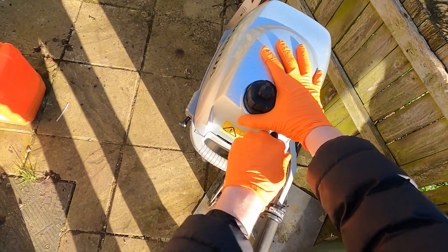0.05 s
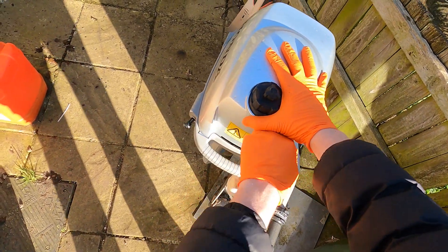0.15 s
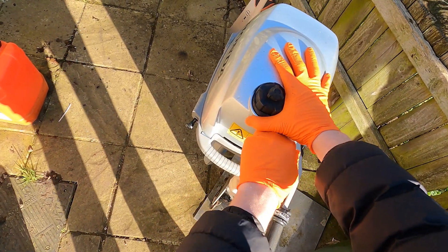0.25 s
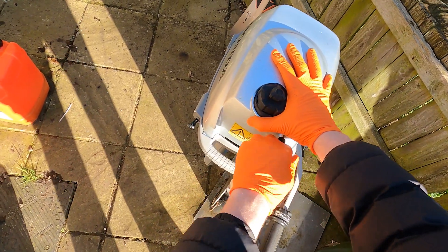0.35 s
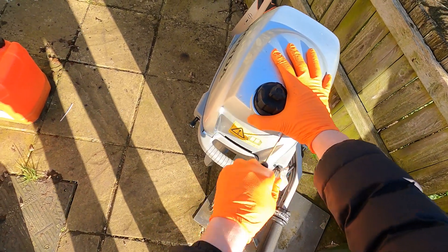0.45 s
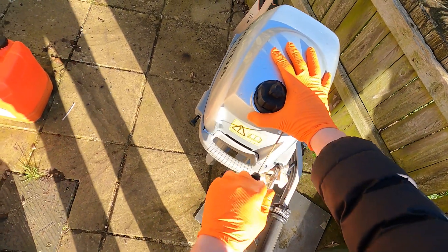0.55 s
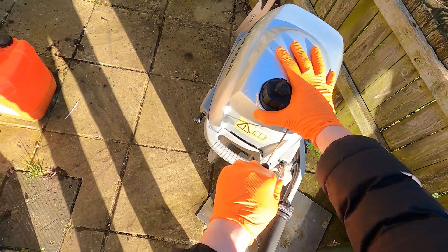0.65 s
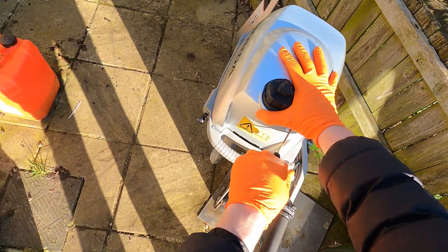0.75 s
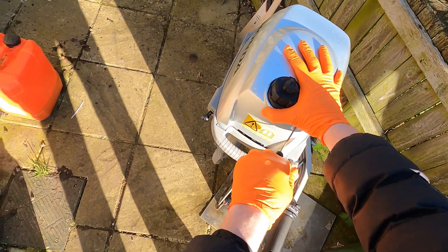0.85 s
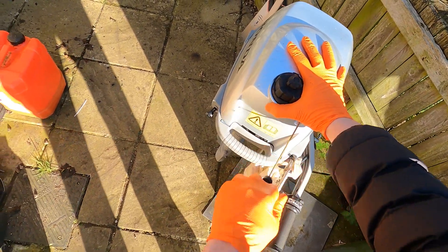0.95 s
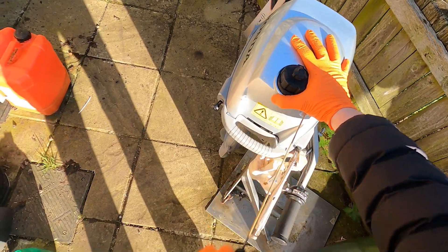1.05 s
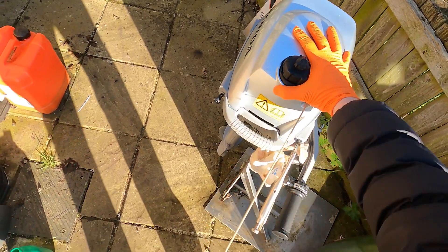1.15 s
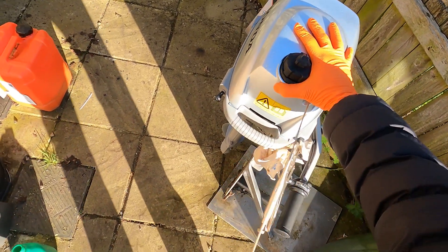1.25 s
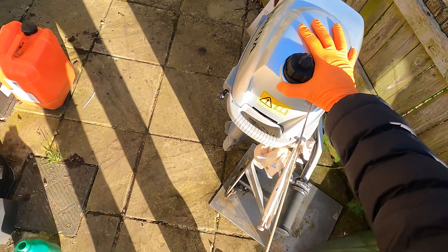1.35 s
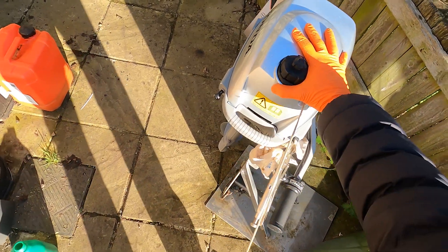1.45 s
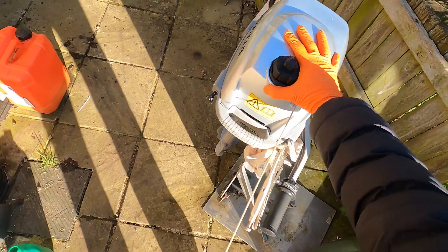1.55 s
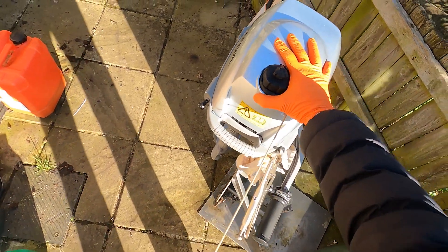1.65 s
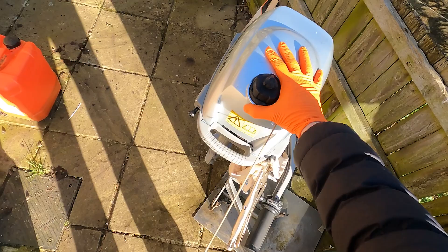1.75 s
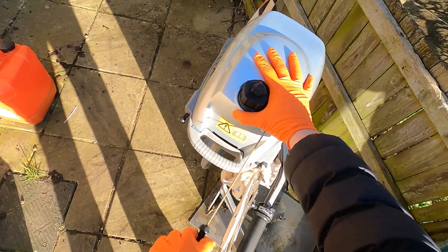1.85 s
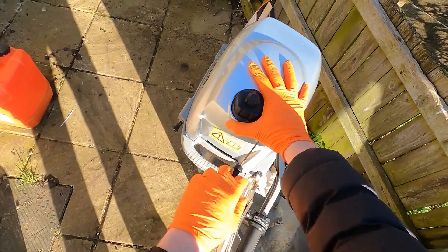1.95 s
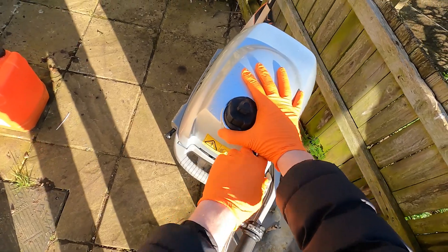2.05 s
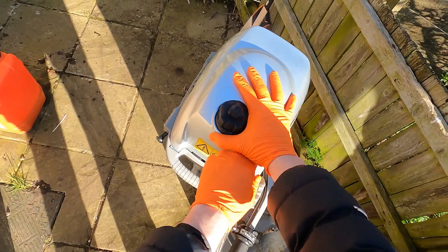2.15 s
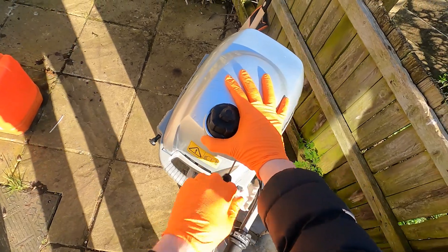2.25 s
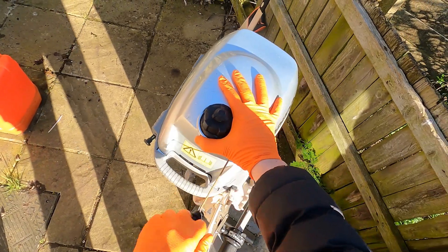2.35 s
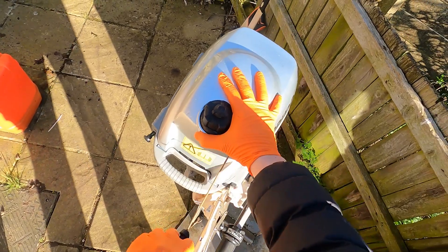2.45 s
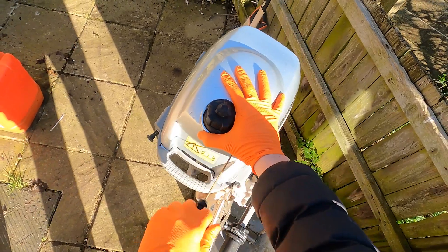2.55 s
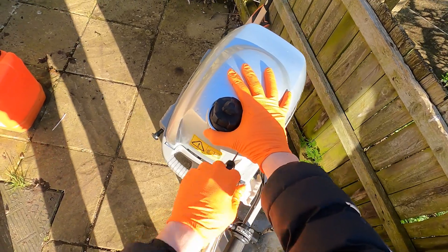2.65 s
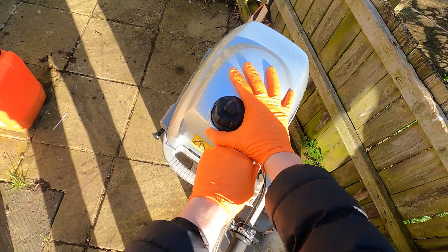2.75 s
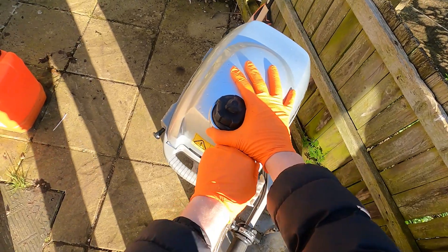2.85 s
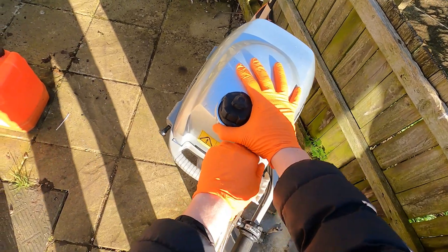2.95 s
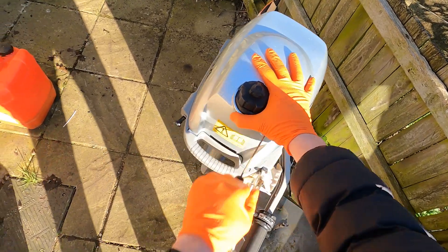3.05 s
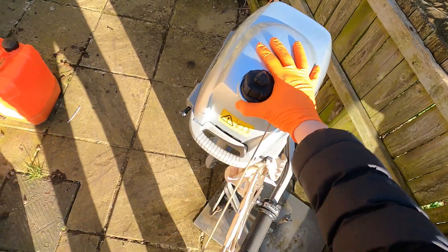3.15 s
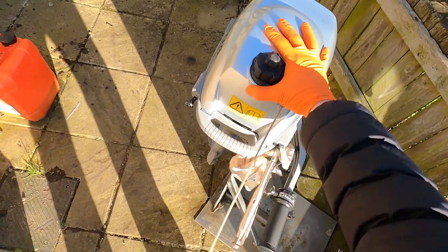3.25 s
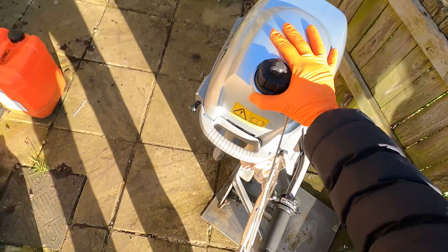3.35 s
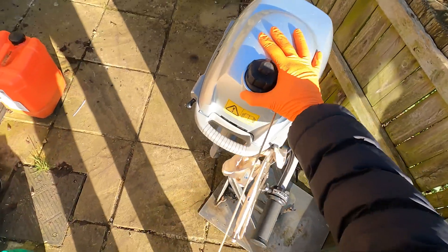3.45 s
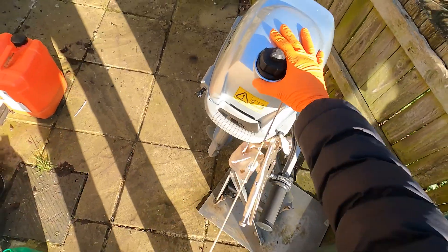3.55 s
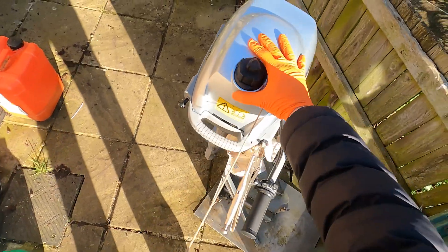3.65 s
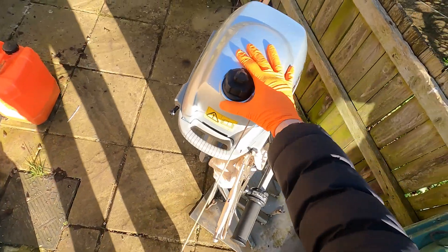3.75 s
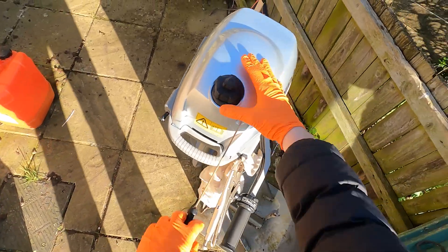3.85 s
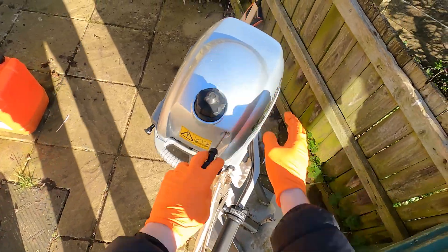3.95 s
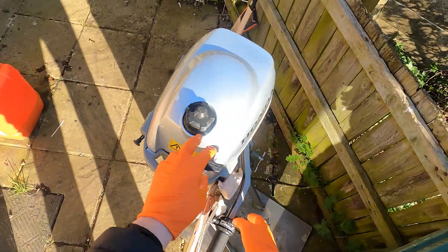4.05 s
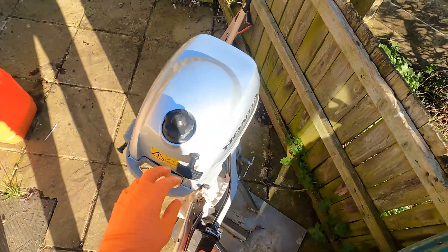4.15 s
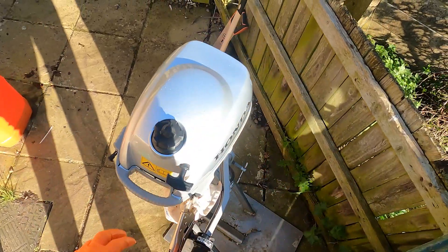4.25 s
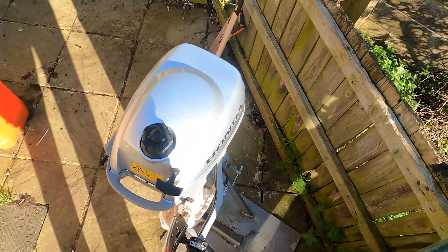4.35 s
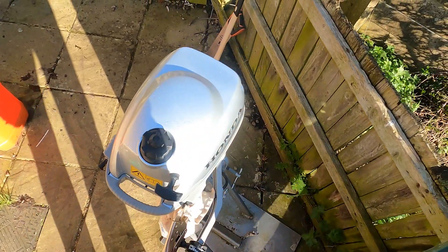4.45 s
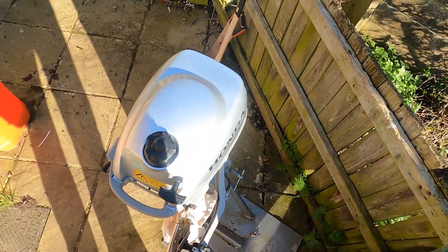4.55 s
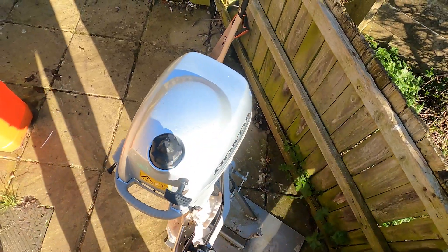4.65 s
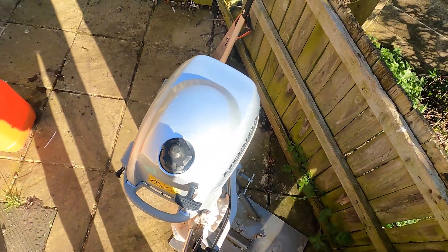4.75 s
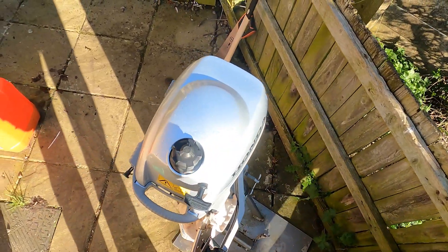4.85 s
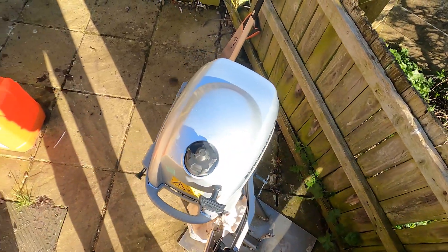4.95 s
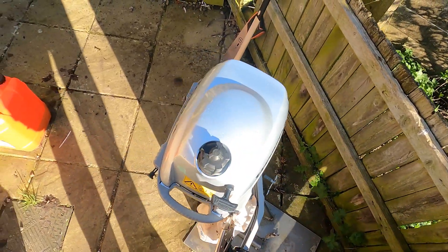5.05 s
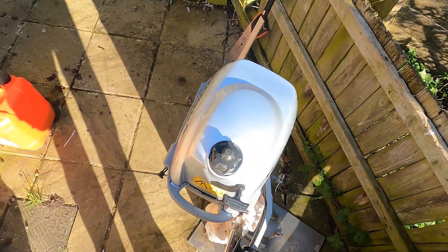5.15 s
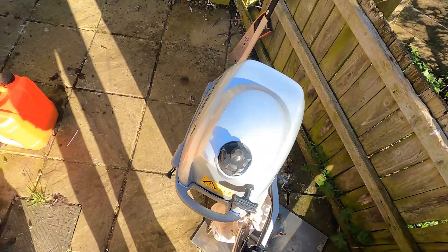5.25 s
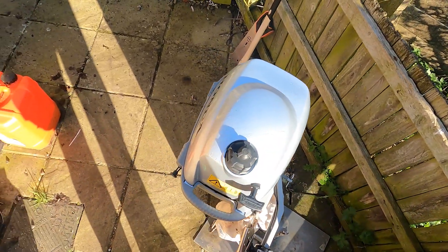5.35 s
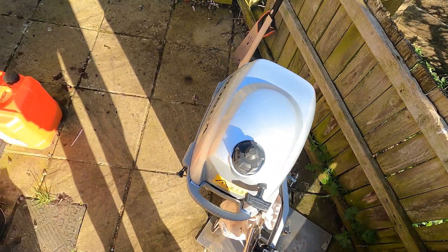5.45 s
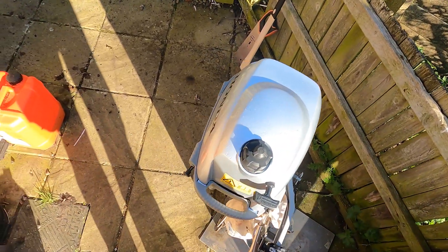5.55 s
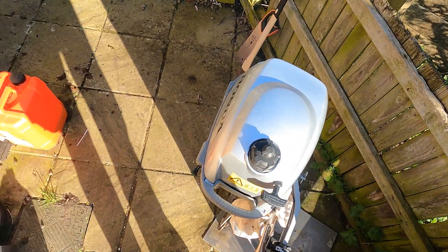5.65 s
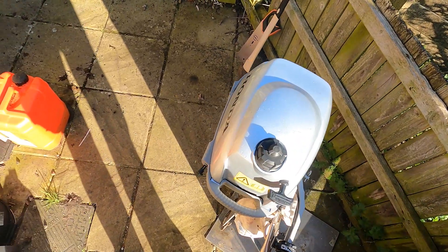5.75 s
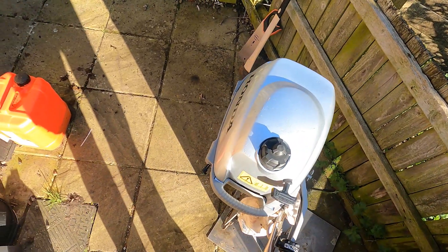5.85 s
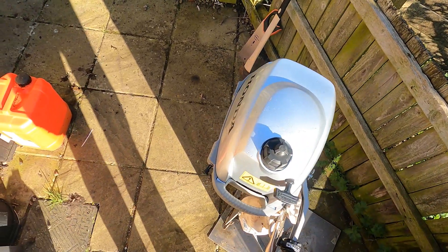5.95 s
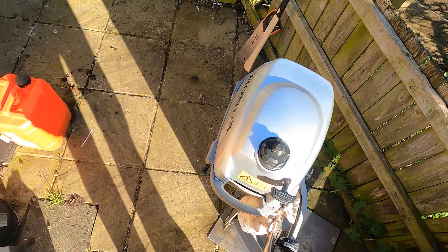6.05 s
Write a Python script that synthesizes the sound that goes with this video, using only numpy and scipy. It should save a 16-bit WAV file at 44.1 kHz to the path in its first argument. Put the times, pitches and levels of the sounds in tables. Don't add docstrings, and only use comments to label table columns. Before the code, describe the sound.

Close, dry outdoor sound from a body-worn camera: sleeve rustle, low wind buffets and hollow plastic taps. A cord is yanked with a rough scrape, hard knocks and dull compression chuffs, but nothing fires. It winds back, a few quieter knocks follow, then a squeaky second pull starts a small single-cylinder engine that races loudly with metallic rattle and hiss, misses a few beats and slows.

```python
import sys
import numpy as np
from scipy import signal
from scipy.fft import rfft, irfft, next_fast_len
from scipy.io import wavfile
from scipy.ndimage import uniform_filter1d

SR = 44100
rng = np.random.default_rng(int(sys.argv[2]) if len(sys.argv) > 2 else 0)


def inscribe(sig):
    pcm = np.round(np.clip(np.atleast_2d(sig).T, -1, 1) * 32767)
    wavfile.write(sys.argv[1], SR, pcm.astype(np.int16))


def voltage_ratio(level):
    return 10 ** (np.asarray(level, float) / 20)


N = 268965
TIME = np.arange(N) / SR
STROKE = np.arange(SR // 6) / SR
HOT_PITCH = 1.11


def evened(x):
    return x / np.sqrt(np.mean(x ** 2) + 1e-20)


def curves(rows, t=TIME):
    s, *columns = np.transpose(rows)
    return [np.interp(t, s, column) for column in columns]


def coloured(x, points, gain=voltage_ratio):
    size = next_fast_len(x.shape[-1])
    hz, value = np.transpose(points)
    bins = np.fft.rfftfreq(size, 1 / SR)
    shape = gain(np.interp(np.log(bins + 1), np.log(hz + 1), value))
    return irfft(rfft(x, size) * shape, size)[..., :x.shape[-1]]


def band(x, lo_hz, hi_hz, order=2):
    edges = [lo_hz, min(hi_hz, SR / 2.1)]
    sos = signal.butter(order, edges, "bandpass", fs=SR, output="sos")
    return evened(signal.sosfilt(sos, x))


def resonate(x, hz, width):
    turn = np.exp(2j * np.pi * np.cumsum(hz * np.ones(len(x))) / SR)
    r = np.exp(-np.pi * width / SR)
    return 2 * (turn * signal.lfilter([1 - r], [1, -r], x / turn)).real


def rings(modes, t, rise_ms=0.79):
    out = np.zeros(len(t))
    for delay_ms, hz, db, t60 in modes:
        u = np.maximum(t - delay_ms / 1000, 0)
        rise = 1 - np.exp(-1000 * u / rise_ms)
        out += voltage_ratio(db - 60 * u / t60) * np.sin(2 * np.pi * hz * u) * rise
    return out


def gritty(spread_db, size):
    grains = evened(uniform_filter1d(rng.standard_normal(N), size))
    return evened(rng.standard_normal(N) * voltage_ratio(spread_db * grains))


def swell(s, hold, db, fall, rise):
    below = np.maximum(rise * (s - TIME), fall * (TIME - s - hold))
    return voltage_ratio(db - np.maximum(below, 0))


def add(mix, s, sound):
    part = mix[round(s * SR):][:len(sound)]
    part += sound[:len(part)]


def gusts():
    # [t/s, hold/s, level/dB, brightness above 90 Hz/dB]
    gust_rows = [(0, .02, -37, -21), (0.374, 0.011, -31, -31), (0.485, .01, -40.5, -31),
                 (.58, 0.027, -24, -49), (0.715, 0.009, -27, -31), (0.857, .1, -25.5, -16),
                 (1.029, 0.062, -22, -1.5), (1.217, 0.017, -28, -9), (1.36, 0.047, -26.5, -3),
                 (1.473, 0.024, -34, 2), (1.64, .05, -45, 4), (1.834, 0.027, -53, 7),
                 (2.303, 0.041, -48, -36), (2.405, 0.28, -49.5, -7), (2.99, .02, -46, -20),
                 (3.12, .05, -64.5, -10)]
    # [t/s, left-right/dB]
    facing = [(0, -5.5), (.6, -5.5), (1.12, -8), (1.2, -4.5), (1.6, -0.5)]
    breeze_db = -53
    shared, own = gritty(2.0, size=900), rng.standard_normal(N)
    deep, bright = band(shared, 21.0, 74.4), band(shared, 95, 184)
    apart = 0.014 * band(own, 22, 123.27)
    gains = [swell(s, hold, db, fall=270, rise=360) for s, hold, db, _ in gust_rows]
    level = voltage_ratio(breeze_db) + sum(gains)
    bright_level = voltage_ratio(breeze_db - 2) + sum(g * voltage_ratio(row[-1]) for g, row in zip(gains, gust_rows))
    low = level * deep + bright_level * bright
    pan_db = curves(facing)[0]
    return np.array([(low + level * apart) * voltage_ratio(pan_db / 2), (low - level * apart) * voltage_ratio(-pan_db / 2)])


def rustle():
    # [f/Hz, density/dB per Hz]
    yard = [(120, -32), (200, -0.5), (240, -4), (488, -13.5), (1090, -17), (1630, -20), (2020, -21),
            (3830, -22.5), (10600, -44), (15600, -80)]
    # [t/s, hold/s, level/dB, fall/dB per s, relative treble/dB]
    sleeves = [
        (0, .17, -51.5, 93, 0.5),
        (0.51, 0.37, -58, 60, 6.5),
        (1.06, 0.15, -40, 97, 4.5),
        (1.23, 0.12, -38, 207, 8),
        (1.515, 0.2, -37, 67, -35),
        (1.745, 0.18, -53, 71, -5),
        (1.964, 0.94, -51, 57, -16.5),
        (3.128, .1, -44, 60, -2.5),
    ]
    low, high = (coloured(gritty(1.15, size=400), yard) for _ in range(2))
    low, high = band(low, 335, 1890), band(high, 1130, 18000)
    moves = sum(swell(*row, rise=280) * (low + voltage_ratio(treble_db) * high) for *row, treble_db in sleeves)
    return moves + voltage_ratio(-63) * low + voltage_ratio(-61.5) * high


def squeak(length, first_hz, last_hz, db, octave_db=-25, bend=1):
    size = round(length * SR)
    hz = first_hz + (last_hz - first_hz) * np.linspace(0, 1, size) ** bend
    noise = rng.standard_normal(size)
    tone = evened(resonate(noise, hz, 40)) + voltage_ratio(octave_db) * evened(resonate(noise, 2 * hz, 90))
    return voltage_ratio(db) * tone * signal.windows.tukey(size, .5)


def pulls():
    # [t/s, hold/s, level/dB, fall/dB per s, relative treble/dB]
    pull_rows = [
        (1.173, 0.21, -27, 103, -14),
        (1.725, 0.21, -40, 73, -7),
        (3.165, 0.076, -30.5, 98, -3),
        (3.287, 0.053, -20.5, 36, -10),
    ]
    # [f/Hz, width/Hz, level/dB]
    pull_tone = [(368, 43, 7), (577, 55, -6), (629, 21, 6), (994, 93, -2), (1575, 83.3, -35),
                 (1850, 88, -23)]
    grit = gritty(3.4, size=120)
    hollow = evened(sum(voltage_ratio(db) * resonate(grit, hz, width) / np.sqrt(width) for hz, width, db in pull_tone))
    low = 0.69 * hollow + 0.66 * band(grit, 236, 1800)
    high = band(grit, 1250, 4050, order=3)
    return sum(swell(*row, rise=900) * (low + voltage_ratio(treble_db) * high) for *row, treble_db in pull_rows)


def knock(peak_db, treble_db, t60, rise_ms):
    # [f/Hz, level/dB, t60/s]
    cowl = [(359, 0, 0.081), (445.5, -2.5, 0.071), (564, -0.5, 0.053), (740, 1, 0.047), (893, 11, 0.018),
            (1114, -5, 0.045), (1415, -13.5, 0.12), (1650, -23.5, 0.052)]
    # [delay/ms, f/Hz, level/dB, t60/s]
    pawls = [(0, 3050, 0, .09), (0, 6150, -3, .07), (0, 9200, -7, .06), (0, 10450, -7, .06)]
    t, rise = np.arange(SR // 5) / SR, rise_ms / 1000 + 1e-4
    noise, luck = rng.standard_normal((2, len(t))), rng.standard_normal((len(cowl), 2))
    scuff = noise[0] * (t / rise) * np.exp(-t / rise)
    modes = [(0, hz * (1 + 0.0424 * a), db + 4.05 * b, ring * t60 / 0.071)
             for (hz, db, ring), (a, b) in zip(cowl, luck)]
    body = band(signal.fftconvolve(scuff, rings(modes, t))[:len(t)], 150, 6000)
    fade = (1 - np.exp(-(t / rise) ** 2)) * voltage_ratio(-60 * t / t60)
    body = body / abs(body).max() + 0.37 * band(noise[1], 228, 2380, order=3) * fade
    top_hz = np.clip(7982 + 150 * treble_db, 3500, 8500)
    crack = band(noise[1], 3430, top_hz) * fade * (0.62 + np.exp(-t / 0.00067)) / 3
    steel = voltage_ratio(-6.5 + min(treble_db, 0)) * rings(pawls, t) * (treble_db < 0) / 3
    return voltage_ratio(peak_db) * (body + voltage_ratio(treble_db) * crack + steel)


def starter():
    # [t/s, peak/dB, relative treble/dB, t60/s]
    knocks = [(0.142, -32, -2.5, 0.21), (.187, -14.5, -38, 0.069), (.202, -22.5, -6.5, 0.095),
              (0.355, -42, -18, .048), (0.385, -45, -2, 0.047), (.574, -25, -3, 0.16),
              (.626, -23, -32, .093), (.965, -55, -22, 0.11), (1.018, -9.5, -4, 0.11), (1.37, -8, -5, 0.15),
              (1.461, -15.5, -3.5, 0.17), (1.479, -12.5, -37, 0.11), (2.166, -15.5, -38, 0.091),
              (2.403, -20, -5, 0.094), (2.427, -16.5, -5, 0.17), (2.543, -34, -21, 0.032),
              (2.605, -30, -11, 0.035), (2.706, -32.5, -34, 0.2), (2.831, -21, -38, 0.11),
              (3.162, -18.5, -4, 0.68), (3.184, -7, -43, 0.14)]
    # [t/s, peak/dB, t60/s]
    chuffs = [(1.176, -13.5, 0.22), (1.193, -18.5, .1), (1.284, -13.5, 0.26), (1.314, -19, 0.13),
              (1.58, -21, .076), (1.6, -25, 0.076), (1.703, -17.5, 0.055), (1.768, -24, 0.061),
              (1.84, -24.5, 0.15)]
    # [t/s, peak/dB, relative treble/dB, t60/s, rise/ms]
    snap = (1.0993, -23, 18, .035, .08)
    # [t/s, length/s, first f/Hz, last f/Hz, level/dB]
    squeaks = [(0, .052, 4340, 4340, -56), (.289, 0.085, 4200, 4260, -51.5), (.42, .083, 5120, 5130, -56),
               (.587, .063, 3000, 3100, -48), (1.375, .051, 6180, 6000, -40), (1.625, .03, 7200, 7150, -62),
               (1.94, .053, 1210, 1190, -41.5), (2.387, 0.062, 3090, 3050, -39),
               (2.6, 0.048, 3050, 3020, -63), (3.17, .05, 2975, 3090, -25), (3.226, 0.082, 2940, 2680, -32),
               (3.29, 0.046, 5170, 5400, -31)]
    # [t/s, length/s, first f/Hz, last f/Hz, level/dB, octave/dB, bend]
    rewind = (1.64, .3, 1810, 1500, -38, -25, 3)
    # [t/s, length/s, first f/Hz, last f/Hz, level/dB, octave/dB, bend]
    whine = (1.18, .12, 2400, 3650, -29, -14, .85)
    out = pulls()
    blows = [(*row, 1) for row in knocks]
    blows += [(s, db, -24, t60, 2) for s, db, t60 in chuffs]  # dull, 2 ms rise
    for s, *row in blows + [snap]:
        add(out, s, knock(*row))
    for s, *row in squeaks + [rewind, whine]:
        add(out, s, squeak(*row))
    return out


def puff():
    opening = 1 - np.exp(-(np.maximum(STROKE - .0022, 0) / .002) ** 2)
    return opening * np.exp(-STROKE / .012) + .09 * np.exp(-STROKE / .05)


def rock(turns, rate, heat, start):
    # [multiple of the firing rate, level at 40 firings per s/dB]
    orders = [(1, -57), (2, -25), (9, -27), (12, -40), (14, -26.5), (15, -35)]
    cold_db = 14.5 * np.exp(-abs(TIME - start) / 0.3)
    running = np.clip((TIME - start) / .03, 0, 1) * rate / 40 * voltage_ratio(cold_db)
    return running * sum(voltage_ratio(db) * heat ** (k > 2) * np.sin(2 * np.pi * k * turns + 0.9 * k) for k, db in orders)


def gas_hiss(fire, s):
    # [f/Hz, density/dB per Hz]
    spectrum = [(470, -18), (800, -12.5), (988, -4.5), (1300, -9.5), (1860, -3), (2160, -8.5), (3020, -13),
                (4550, -15), (5620, -13), (6060, -17), (12400, -46.5), (15600, -16)]
    cold_db = 5.5 * np.exp(-(s - s[0]) / 0.28)
    noise = evened(coloured(gritty(0.52, size=60), spectrum))
    return 0.75 * noise * fire(-24 + cold_db, -24 + cold_db, puff(), 1.67)


def loose_parts(fire):
    # [f/Hz, width/Hz, level/dB]
    parts = [(1870, 160, -4), (2450, 80, -10), (5560, 220, -7), (5690, 120, -13), (3420, 150, -12),
             (4950, 120, -13), (4150, 80, -13), (2760, 80, -12), (3620, 90, -13), (5860, 120, -11),
             (1590, 90, -11), (12600, 700, -24)]
    drift_db, drift_s = 5, .07
    shake = gritty(1.5, size=40)
    steps = np.arange(0, N / SR + 1, drift_s)
    buzz = np.zeros(N)
    for hz, width, db in parts:
        drift = np.interp(TIME, steps, rng.standard_normal(len(steps)))
        buzz += voltage_ratio(db + drift_db * drift) * resonate(shake, hz, width) / np.sqrt(width)
    return evened(buzz) * fire(-30, -31.5, puff() + 0.013, 0.42)


def metal(fire):
    # [delay/ms, f/Hz]
    fins = [(3.9, 1860), (3.9, 1770), (4, 1960), (8.4, 1880), (3.5, 2455), (3.5, 1530), (3.2, 986),
            (3.4, 1088), (3.5, 2853), (19, 1860)]
    # [level/dB, t60/s]
    fins_ring = [(0, .05), (-9, .035), (-7, .035), (-5, .035), (-11, .05), (-11, .04), (-13, .04),
                 (-13, .05), (-16, .04), (-16, .04)]
    # [delay/ms, f/Hz, level/dB, t60/s]
    clank = [(3.4, 5580, 0, .05), (3.4, 5700, -3, .045), (3.4, 4950, -10, .025), (3.4, 2870, -8, .03),
             (3.4, 3450, -10, .03), (20, 5600, -10, .03)]
    out = fire(-25.15, -26.65, rings(np.hstack([fins, fins_ring]), STROKE, rise_ms=2.3), 0.76)
    out += fire(-32.5, -50.5, rings(clank, STROKE, rise_ms=1.7), 1.3)
    return out * (1 + .25 * band(rng.standard_normal(N), 30, 250))


def exhaust(fire, heat, at):
    # [delay/ms, f/Hz, level/dB, t60/s]
    boom_modes = [(3.06, 210, -6.5, 0.062), (11.6, 132.5, 8, 0.077), (3.6, 50, -22, 0.29),
                  (4, 170, -10, 0.73)]
    # [delay/ms, f/Hz]
    pop_modes = [(.7, 365), (.7, 600), (.7, 480), (1, 665), (6.6, 350), (10.6, 430), (2, 270), (1.2, 550)]
    # [level/dB, t60/s]
    pop_ring = [(18, 0.048), (4.5, 0.11), (22, 0.0094), (-11, 0.63), (-1, 0.18), (13.5, 0.024), (5, 0.17),
                (2.5, 0.1)]
    # [cool f/Hz, width/Hz, share swallowed cool, share swallowed hot]
    traps = [(98.4, 34, 0.83, 0.25), (184.4, 24, 0.71, 0.76), (290.4, 47, 0.94, 0.94), (594, 34, 1, 0.99)]
    hot, hot_time = heat[at], STROKE * HOT_PITCH
    luck = rng.standard_normal((2, len(at)))
    boom = fire(-16.5, -14.5, rings(boom_modes, STROKE), .4, luck[0], share=1 - hot)
    boom += fire(-16.5, -14.5, rings(boom_modes, hot_time), 0.24, luck[0], share=hot)
    modes = np.hstack([pop_modes, pop_ring])
    pop = fire(-20.5, -13.5, rings(modes, STROKE, rise_ms=.9), .4, luck[1], share=1 - hot)
    pop += fire(-20.5, -13.5, rings(modes, hot_time, rise_ms=1.0), 0.27, luck[1], share=hot)
    pop *= 1 + .05 * band(rng.standard_normal(N), 15, 200)
    pipe = boom + pop
    for hz, width, cool, warm in traps:
        swallowed = np.clip(cool + (warm - cool) * heat, 0, 1)
        pipe = pipe - swallowed * resonate(pipe, hz * (1 + (HOT_PITCH - 1) * heat), width)
    return pipe


def engine():
    # [t/s, firings per s]
    speed = [(3.28, 11.64), (3.42, 24.2), (3.62, 31.66), (3.85, 37.02), (4.18, 40.58), (4.35, 39.97),
             (4.58, 39.4), (4.92, 30.06), (5.2, 27.64), (5.4, 27.39), (5.55, 26.23), (6.1, 24.06)]
    # [t/s, opening 0 idle to 1 wide open]
    throttle_rows = [
        (3.29, 0.17),
        (3.38, 0.66),
        (3.6, .85),
        (4.2, 0.95),
        (4.64, 0.83),
        (4.8, 0.72),
        (5, 0.33),
        (6.1, 0),
    ]
    # [t/s, level/dB]
    misses = [
        (4.643, -3),
        (4.697, -11),
        (4.908, -9),
    ]
    first_turn, lead_s = .208, .0022
    rate = curves(speed)[0]
    turns = np.cumsum(rate * (TIME >= speed[0][0])) / SR + 1 - first_turn
    at = np.flatnonzero(np.diff(np.floor(turns))) - round(lead_s * SR)
    s = at / SR
    weak_db = sum(db * (abs(s + lead_s - miss) < .01) for miss, db in misses)
    throttle = curves(throttle_rows, s)[0]
    heat = np.clip((rate - 31) / (38.2 - 31), 0, 1)

    def fire(idle_db, open_db, shape, spread_db, luck=None, share=1):
        if luck is None:
            luck = rng.standard_normal(len(at))
        db = idle_db + (open_db - idle_db) * throttle + weak_db + spread_db * luck
        train = np.zeros(N)
        train[at] = share * voltage_ratio(db) * np.sqrt(SR / rate[at])
        return signal.oaconvolve(train, shape / np.linalg.norm(shape))[:N]

    shaking = rock(turns, rate, heat, s[0]) + loose_parts(fire)
    return shaking + gas_hiss(fire, s) + metal(fire) + exhaust(fire, heat, at)


def ports(x):
    # [t/s, width 0-1]
    width_rows = [(0, 1), (3.2, 0), (3.4, 0), (3.8, 0.01), (4.15, 0.32), (6.1, 0.95)]
    # [f/Hz, level/dB]
    side = [(60, -48), (130, -37.5), (290, -41), (640, -19), (1410, -10.5), (3100, -6.5), (8000, -5.5),
            (13000, -1)]
    # [f/Hz, left-right/dB]
    tilt = [(60, 0), (6000, .4), (9000, 1.2), (12000, 12), (15000, 11)]
    t = np.arange(SR // 20) / SR
    smear = rng.choice([-1., 1.], len(t)) * np.exp(-t / .012)
    other = signal.oaconvolve(x, smear / np.linalg.norm(smear))[:N]
    apart = coloured(other, side) * curves(width_rows)[0]
    lean = coloured(x, tilt, lambda db: (voltage_ratio(db) - 1) / (voltage_ratio(db) + 1))
    return np.array([x + lean + apart, x - lean - apart])


def scene():
    return gusts() + ports(rustle() + starter() + engine())


def low_pass(x):
    return signal.sosfilt(signal.butter(12, 15710, fs=SR, output="sos"), x)


def record(dry):
    response = [(8, -40), (20, 1.5), (13000, -1.0), (14300, -13), (15700, -26.0)]  # (f/Hz, level/dB)
    limited = coloured(0.97 * np.tanh(dry / 1.218), response)
    edge = signal.firwin(511, 15750, window=("kaiser", 9), fs=SR)
    mix = signal.oaconvolve(limited, edge[None], "same")
    return low_pass(mix)


dry = scene()
out = record(dry)
inscribe(out)
```